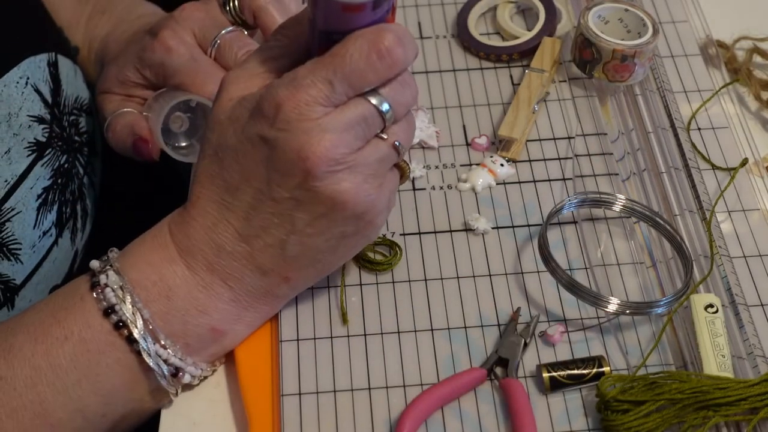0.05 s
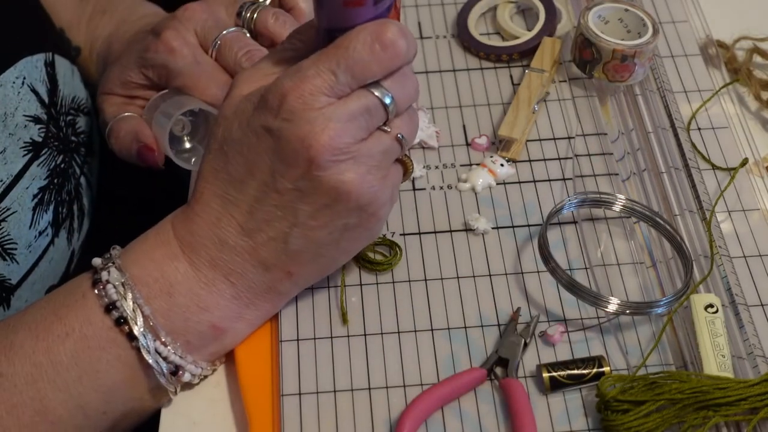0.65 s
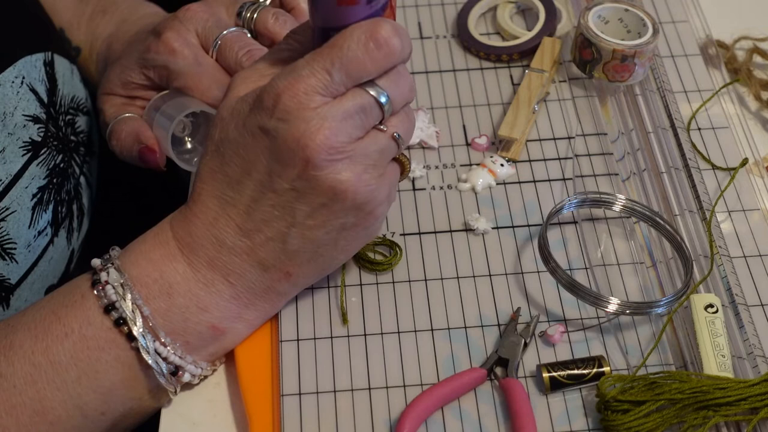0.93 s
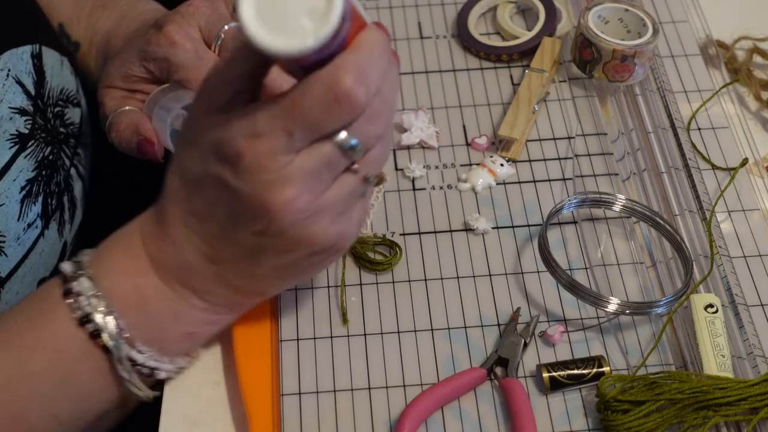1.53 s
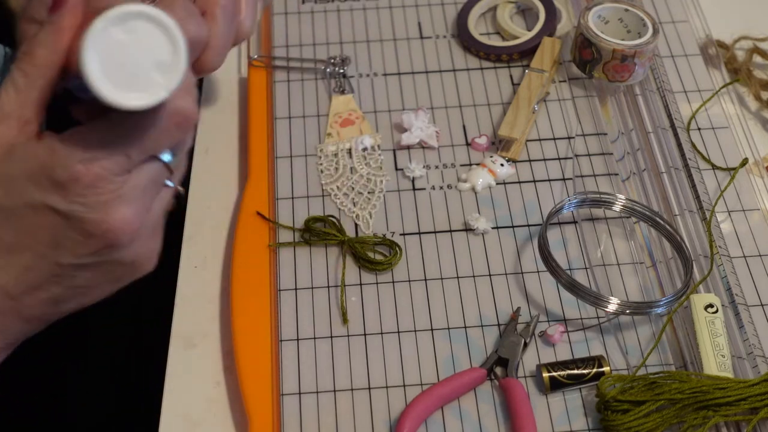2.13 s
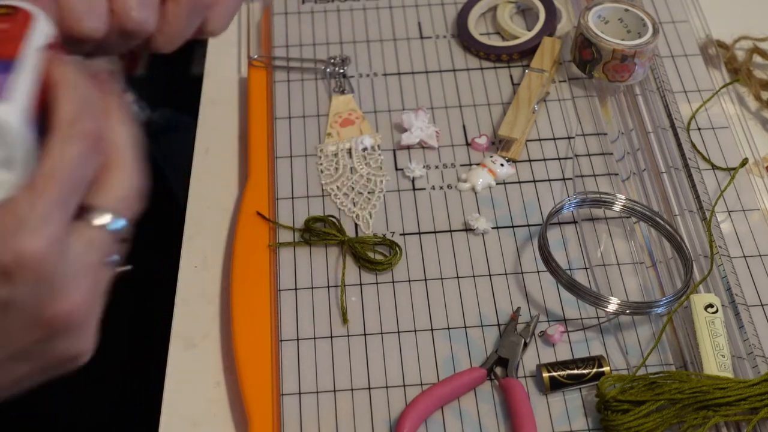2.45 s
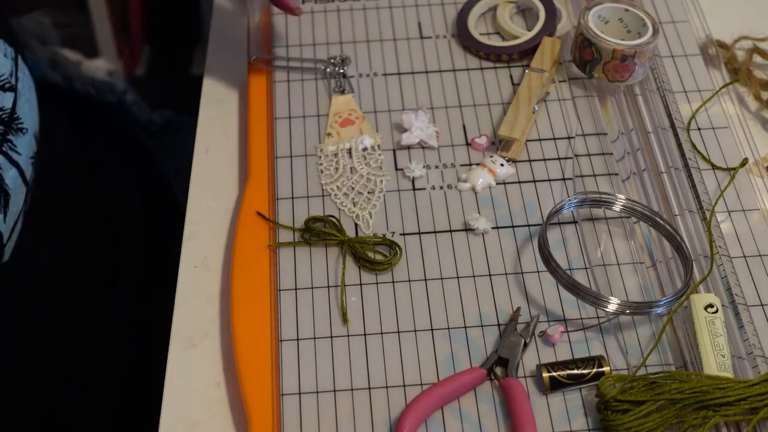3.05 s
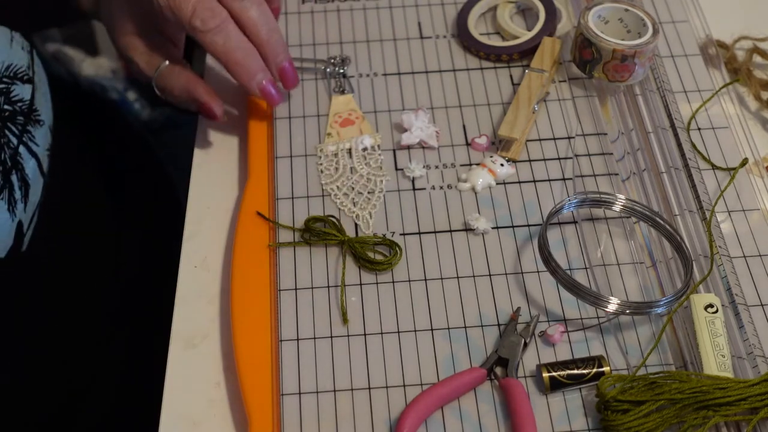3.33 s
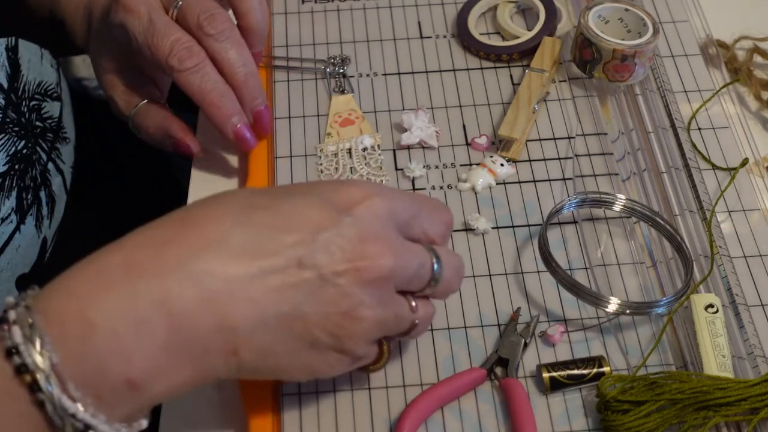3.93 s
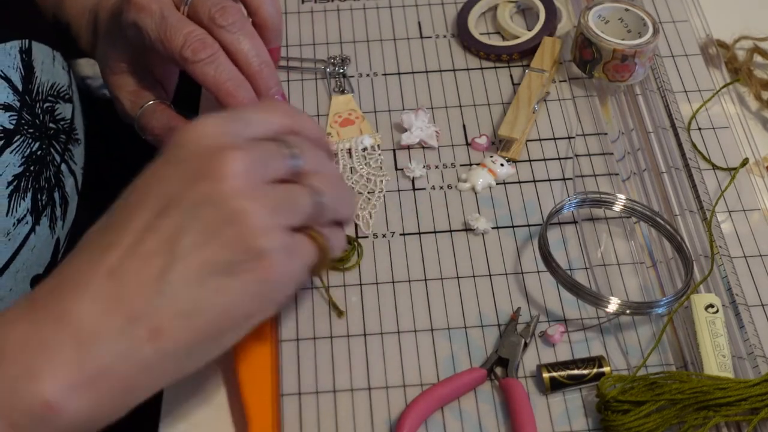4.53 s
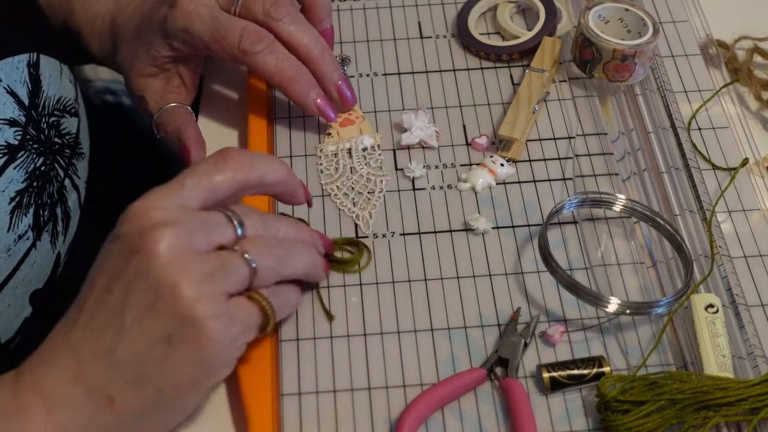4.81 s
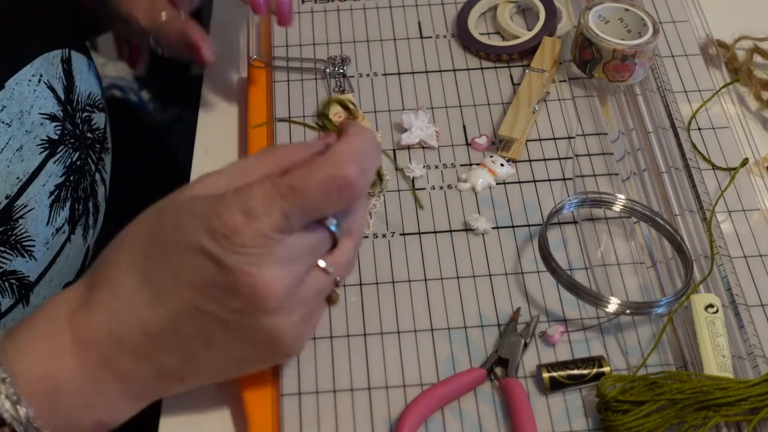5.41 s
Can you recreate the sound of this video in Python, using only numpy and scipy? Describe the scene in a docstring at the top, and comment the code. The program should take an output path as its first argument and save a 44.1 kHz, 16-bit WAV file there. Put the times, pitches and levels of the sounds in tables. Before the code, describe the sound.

A plastic glue stick is handled, capped with a snap and set down, then nails tick on a mat while a fan hums softly.

```python
"""A small fan hums in a small room while rings and nails click on a glue stick at a craft table.
Fingers rub softly and the plastic squeaks. The cap scrapes on, catches and snaps home, and the tube
is stood on the table with a knock. Then nails and rings tick on a plastic mat as a cord bow is
picked up. Each hit makes the object ring briefly; each rub is noise that swells and fades."""
import sys
import numpy as np
from scipy import signal
from scipy.fft import rfft, irfft, next_fast_len
from scipy.io import wavfile
from scipy.ndimage import uniform_filter1d

SR = 44100
rng = np.random.default_rng(int(sys.argv[2]) if len(sys.argv) > 2 else 0)


def master(y):
    """Save y as 16-bit WAV."""
    cut = np.clip(np.atleast_2d(y).T, -1, 1)
    pcm = np.round(cut * 32767)  # scale
    wavfile.write(sys.argv[1], SR, pcm.astype(np.int16))


N = 249850
T = np.arange(N) / SR
HIT_T = T[:SR // 2]  # the clock for one hit, in seconds

# the tones the capped tube rings with: pitch_hz, level_db, fade_s (time to fall by 60 dB)
TUBE_TONES = [(456, -18.5, 0.029), (855, -15, 0.015), (1436, -20, 0.038), (1990, -37, 0.0042),
              (2670, -26, 0.017), (3207, -9, 0.017), (3700, -8, 0.0091), (4740, -13, 0.006),
              (5620, -19.5, 0.0079)]


def undb(db):
    """Turn decibels into a number to multiply by."""
    return 10 ** (np.asarray(db) / 20)


def unit(x):
    """Scale a sound to an average strength (rms) of 1."""
    return x / np.sqrt(np.mean(x ** 2))


def unit_hit(x):
    """Give every hit the same energy: that of 4 ms at strength 1."""
    return x * np.sqrt(.004 * SR / np.sum(x ** 2))


def keep(x, hz, side, order=2):
    """Keep the "low" or "high" side of a pitch; a higher order cuts more sharply."""
    return signal.sosfilt(signal.butter(order, min(hz, SR * .45), side, fs=SR, output="sos"), x)


def noise(gain):
    """Steady noise, with gain(hz) setting how strong each pitch is."""
    n = next_fast_len(N, real=True)
    return unit(colour(rng.standard_normal(n), gain)[:N])


def colour(x, gain):
    """Turn each pitch in a sound up or down by gain(hz)."""
    return irfft(rfft(x) * gain(np.fft.rfftfreq(len(x), 1 / SR) + 1), len(x))


def curve(points):
    """A gain that joins up (pitch_hz, level_db) points."""
    hz, db = np.transpose(points)
    return lambda f: undb(np.interp(np.log(f), np.log(hz), db))


def peak(hz, width_hz):
    """A gain that peaks at one pitch and falls steeply on both sides."""
    return lambda f: 1 / (1 + ((f / hz - hz / f) * hz / (0.75 * width_hz)) ** 2)


def ring(tones):
    """A struck object rings with several fading tones; neighbours swing opposite ways."""
    return sum((-1) ** k * undb(db - 60 * HIT_T / fade_s) * np.sin(2 * np.pi * hz * HIT_T)
               for k, (hz, db, fade_s) in enumerate(tones))


def burst(fade_s):
    """Noise that dies away: too many tones to tell apart."""
    return rng.standard_normal(len(HIT_T)) * undb(-60 * HIT_T / fade_s)


def fade_in(rise_s):
    """Soften the start of a hit."""
    return 1 - np.exp(-HIT_T / rise_s)


def add(track, start_s, x):
    """Mix a sound into the track."""
    i = int(start_s * SR)
    track[i:i + len(x)] += x[:N - i]


def stroke(x, start_s, length_s, level_db, grip_db=2):
    """One rub swells and fades, catching unevenly on the surface."""
    out, n = np.zeros(N), int(length_s * SR)
    swell = np.sin(np.linspace(0, np.pi, n))
    roughness = unit(uniform_filter1d(rng.standard_normal(SR), size=300))[:n]
    grip = undb(grip_db * np.clip(roughness, -2, 2))
    add(out, start_s, undb(level_db) * swell * unit(grip * x[:n]))
    return out


def taps(hits, tones, pitch_span, crack_db, crack_fade_s, contact_s):
    """Light hits on one object; a harder contact sounds brighter and stirs the low tones less."""
    out, body = np.zeros(N), unit_hit(ring(tones))
    for start_s, level_db, top_hz in hits:
        crack = unit_hit(keep(burst(crack_fade_s), 7100, "low", order=1))
        click = (body + undb(crack_db) * crack) * fade_in(contact_s)  # the nail or rim settles
        click = keep(keep(click, top_hz / pitch_span, "high"), top_hz, "low")
        add(out, start_s, undb(level_db) * unit_hit(click))
    return out


def fan(air_db=-63.5):
    """A fan moves air softly and hums in a few narrow bands."""
    # the tone colour of the moving air: pitch_hz, level_db
    air_shape = [(25, -43), (45, -7), (60, -5.5), (110, -2), (165, 1), (260, -3), (600, -2.5), (950, -3.5),
                 (1300, -5), (2400, -10), (4200, -18.5), (8000, -24), (15500, -28.5)]
    # the bands the fan hums in: pitch_hz, width_hz, level_db
    hums = [(157.7, 8.3, -77.5), (856.5, 104, -62.5), (2207, 340, -72.5), (3260, 520, -81)]
    # how strong the left-right spread is against the middle: pitch_hz, level_db
    spread = [(40, -12), (110, -10.5), (380, 2), (850, -6), (1300, 2), (2400, -1), (12000, -2.5)]

    def air():
        rush = undb(air_db) * noise(curve(air_shape))
        return rush + sum(undb(db) * noise(peak(hz, width_hz)) for hz, width_hz, db in hums)
    side = colour(air(), curve(spread))
    return air() + np.array([[1], [-1]]) * side


def room(x, tail_db=-10, side_db=-5, fade_s=0.34, treble_fade_s=0.32, pan_db=1.1, scatter_db=-14):
    """The sound arrives directly, then as a few near echoes and the short tail of a furnished room."""
    # first echoes from table, body and walls: delay_s, level_db, left_minus_right_db
    echoes = [(.0030, -27, -1), (.0070, -18, 2), (.0097, -17.5, -8.5), (0.0132, -25, -7), (.0200, -21, 1)]
    # what the walls and furniture send back: pitch_hz, level_db
    walls = [(200, 0), (450, 2), (1000, 0.5), (1550, -2.5), (2300, 4), (3200, 0), (4500, 2.5), (8000, 3),
             (15000, 4)]

    def tail():
        late = keep(burst(fade_s), 3000, "low") + keep(burst(treble_fade_s), 3360, "high")
        late = colour(late, curve(walls)) * fade_in(0.008)
        return undb(tail_db) * late / np.sqrt(np.sum(late ** 2))
    sides = np.array([1, -1])  # left, right
    # hands and clutter scatter the treble differently to each side
    scatter = keep(burst(fade_s=0.035), 4500, "high")
    scatter = undb(scatter_db) * scatter / np.sqrt(np.sum(scatter ** 2))
    response = tail() + sides[:, None] * (undb(side_db) * tail() + scatter)
    response[:, 0] += undb(sides * pan_db / 2)  # the direct sound
    for delay_s, level_db, lean_db in echoes:
        response[:, int(delay_s * SR)] += undb(level_db + sides * lean_db / 2)
    return signal.fftconvolve(x[None], response, axes=1)[:, :N]


def rubs(base_width_hz=360):
    """Glue, skin and cord rub with a soft hiss; higher strokes cover a wider band."""
    # the soft strokes: start_s, length_s, level_db, pitch_hz
    strokes = [(1.176, 0.12, -58, 830), (1.252, 0.24, -64.5, 820), (1.522, 0.17, -59, 3600),
               (1.734, 0.19, -65.5, 2360), (2.63, 0.15, -69.5, 3800), (2.797, 0.36, -71, 4820),
               (4.095, 0.2, -75.5, 5000), (4.666, 0.32, -69, 3560), (5.316, 0.41, -75.5, 6000)]
    return sum(stroke(noise(peak(hz, base_width_hz + hz)), start_s, length_s, level_db)
               for start_s, length_s, level_db, hz in strokes)


def squeaks(wobble_share=0.061):
    """Plastic squeaks under the fingers: a thin, unsteady tone glides through each stroke."""
    # the squeaky strokes: start_s, length_s, level_db, start_hz, end_hz
    glides = [(1.153, 0.32, -85.5, 6250, 6550), (1.223, 0.24, -77.5, 3780, 4040),
              (1.553, 0.085, -67.5, 13300, 12300), (1.73, 0.4, -74, 6380, 6680)]
    out = np.zeros(N)
    for start_s, length_s, level_db, start_hz, end_hz in glides:
        pitch_hz = np.interp(T[:SR], [0, length_s], [start_hz, end_hz])
        phase = 2 * np.pi * np.cumsum(pitch_hz) / SR
        wobble = keep(rng.standard_normal((2, SR)), wobble_share * start_hz / 2, "low")
        tone = wobble[0] * np.cos(phase) + wobble[1] * np.sin(phase)
        out += stroke(tone, start_s, length_s, level_db)
    return out


def mat_ticks():
    """Nails and small pieces tick on the plastic mat and make it ring."""
    # the ticks on the mat: start_s, level_db, top_hz
    hits = [(3.9660, -55, 6430), (4.1286, -50.5, 11000), (4.2678, -56, 6900), (4.2905, -58, 3500),
            (4.7593, -47, 6500), (4.7963, -40, 5970), (4.8203, -43, 5000), (5.2128, -33.5, 6160),
            (5.2220, -35, 7000)]
    # the tones of the mat: pitch_hz, level_db, fade_s
    tones = [(612, 1, 0.058), (1100, 2, 0.033), (1310, -8, 0.036), (1677, -1.5, 0.034), (2130, 3.5, 0.019),
             (3210, -3, 0.028), (4200, 0, 0.02), (5800, -2, 0.0091), (7900, 2.5, 0.01)]
    return taps(hits, tones, pitch_span=8.4, crack_db=0, crack_fade_s=0.039, contact_s=0.00028)


def stick_clicks():
    """Rings and nails click on the open glue stick and make it ring."""
    # the clicks on the stick: start_s, level_db, top_hz
    hits = [(.0359, -52, 6000), (.047, -52, 6840), (.5553, -37.5, 4440), (1.5355, -36, 3260),
            (1.5385, -32.5, 3150), (1.5495, -39.5, 1620), (1.559, -43, 1110), (1.6545, -35, 5200),
            (1.6640, -31, 5370), (1.8698, -55, 7500), (2.4609, -55.5, 9400), (2.5657, -52, 8900)]
    # the tones of the open stick: pitch_hz, level_db, fade_s
    tones = [(528, -7, 0.086), (740, -3.5, 0.017), (948, -5.5, 0.071), (1313, -2, 0.039),
             (1718, -5.5, 0.04), (2090, 6.5, 0.0094), (2730, -6.5, 0.03), (3130, 9.5, 0.013),
             (4100, -7, 0.013), (5180, -1, 0.022), (7300, -22, 0.011)]
    return taps(hits, tones, pitch_span=4.73, crack_db=3, crack_fade_s=0.031, contact_s=0.00059)


def table_knocks(boom_db=-8, boom_fade_s=0.37, boom_top_hz=420):
    """The tube lands on its rim, then flat, and the table booms briefly; the hands bump dully."""
    # the tube meets the table: start_s, level_db, top_hz
    landings = [(3.2945, -27, 2170), (3.303, -38, 900)]
    # the tones of the table top: pitch_hz, level_db, fade_s
    tones = [(174, -10, 0.37), (248, -10, 0.12), (298, -0.5, 0.12), (428.6, 0, 0.19), (557, -12, 0.082),
             (648, 1.5, 0.089), (702, -2, 0.07), (840, 3, 0.067), (1023, -6, 0.079), (1140, -8, 0.049),
             (1524, 4, 0.018), (1900, -1, 0.031), (2525, -2, 0.027)]
    # soft bumps of the hands: start_s, level_db, pitch_hz
    bumps = [(1.228, -50.5, 453), (1.379, -50.5, 150), (1.407, -58.5, 200), (1.704, -55, 230),
             (1.762, -53.5, 254), (2.220, -47, 212), (5.403, -56, 135)]
    out = np.zeros(N)
    for start_s, level_db, top_hz in landings:
        knock = unit_hit(ring(tones)) + undb(-6) * unit_hit(burst(fade_s=0.069))
        knock = keep(keep(knock, top_hz, "low"), 175, "high")
        boom = keep(burst(boom_fade_s), boom_top_hz, "low")
        boom = keep(boom, 120, "high", order=3) * fade_in(0.0072)
        add(out, start_s, undb(level_db) * (unit_hit(knock) + undb(boom_db) * unit_hit(boom)))
    for start_s, level_db, pitch_hz in bumps:
        bump = ring([(pitch_hz, 0, 0.05)]) * fade_in(0.0019)
        add(out, start_s, undb(level_db) * unit_hit(bump))
    return out


def cap_pitch(time_s, open_hz=2310, closed_hz=1565, push_start_s=2.066, push_length_s=0.07):
    """The air space under the cap rings lower as the cap goes down the tube."""
    pushed = np.clip((time_s - push_start_s) / push_length_s, 0, 1)
    return open_hz + (closed_hz - open_hz) * pushed


def cap_slide(slip_start_s=2.096, slip_length_s=0.036, slips_per_s=460, slip_db=-40, tube_db=-12):
    """The cap's rim scrapes along the tube, then sticks and slips in a quick run of uneven little hits."""
    out, tube = np.zeros(N), undb(tube_db) * ring(TUBE_TONES)
    for start_s in slip_start_s + np.arange(0, slip_length_s, 1 / slips_per_s):
        late, size, detune = rng.uniform(-1, 1, 3)
        slip = ring([(cap_pitch(start_s) * (1 + 0.045 * detune), 0, 0.008)]) + tube
        slip = unit_hit(keep(keep(slip, 3000, "low", order=3), 340, "high"))
        add(out, start_s + late / slips_per_s / 2, undb(slip_db + 2 * size) * slip)
    scrape = noise(peak(hz=1890, width_hz=840))
    return out + stroke(scrape, start_s=1.844, length_s=0.35, level_db=-60)


def cap_snaps(cap_fade_s=0.012, contact_s=0.00043, tube_db=-3, crackle_db=-1, clatter_db=-9):
    """The cap catches on the tube and at last snaps home over its ridge."""
    # the catches and the final snap: start_s, level_db, top_hz, crack_db
    catches = [(2.0645, -30.5, 4400, -14), (2.0930, -23, 4040, -36), (2.1230, -31.5, 2600, -18.5),
               (2.1470, -25.5, 4400, -11), (2.2184, -16, 5900, -21.5)]
    out, tube = np.zeros(N), undb(tube_db) * ring(TUBE_TONES)
    pulse = unit_hit(signal.unit_impulse(len(HIT_T), int(.001 * SR)))
    for start_s, level_db, top_hz, crack_db in catches:
        shell = keep(ring([(cap_pitch(start_s), 0, cap_fade_s)]) + tube, top_hz, "low", order=4)
        # the rim lets go with one sharp pulse and a brief crackle
        crack = pulse + undb(crackle_db) * unit_hit(burst(fade_s=0.04))
        crack = keep(keep(crack, 2300, "high"), 8550, "low", order=3)
        # the loose screw and glue carrier inside the tube clatter
        clatter = keep(keep(burst(fade_s=0.032), 356, "high"), 2800, "low", order=3)
        snap = unit_hit(shell) + undb(crack_db) * unit_hit(crack) + undb(clatter_db) * unit_hit(clatter)
        snap = keep(snap * fade_in(contact_s), 397, "high", order=3)
        add(out, start_s, undb(level_db) * unit_hit(snap))
    return out


def scene():
    """The handling noises sound in the room, over the fan."""
    handling = stick_clicks() + mat_ticks() + cap_snaps() + cap_slide()
    handling += table_knocks() + rubs() + squeaks()
    return room(handling) + fan()


def record(dry, top_hz=15750):
    """Cut away the very highest treble."""
    return signal.sosfilt(signal.ellip(10, .2, 70, top_hz, fs=SR, output="sos"), dry)


dry = scene()
out = record(dry)
master(out)
```